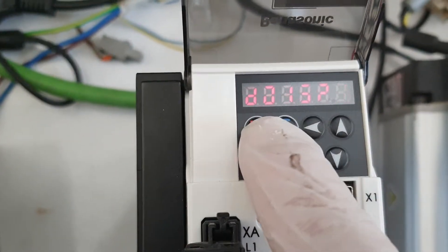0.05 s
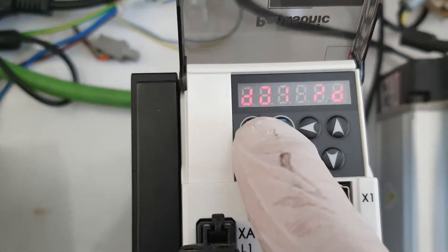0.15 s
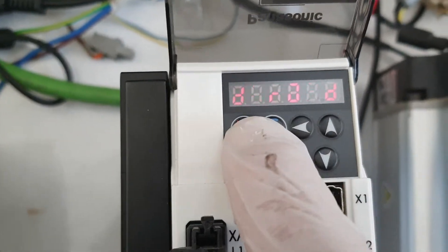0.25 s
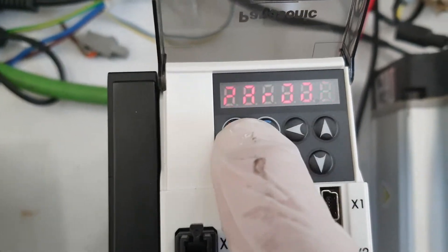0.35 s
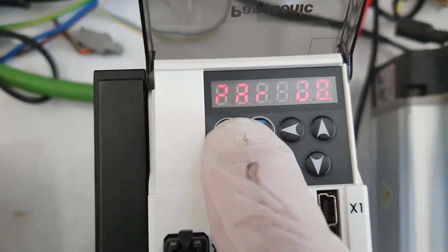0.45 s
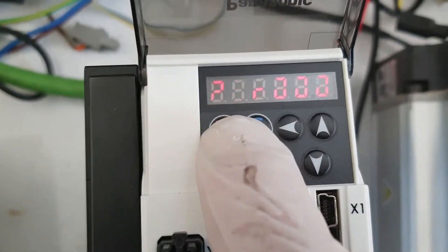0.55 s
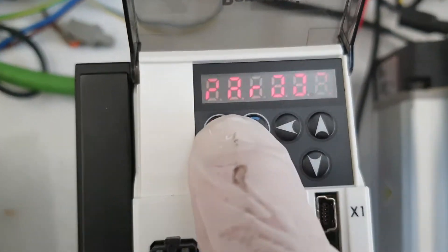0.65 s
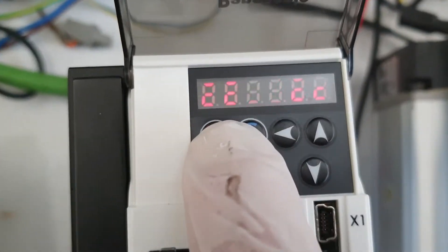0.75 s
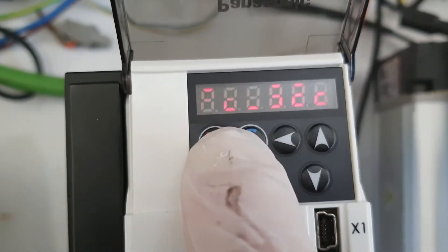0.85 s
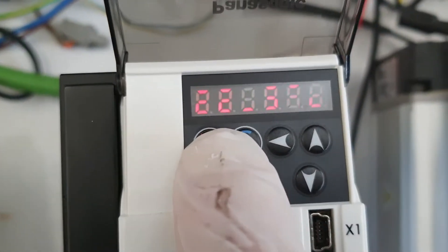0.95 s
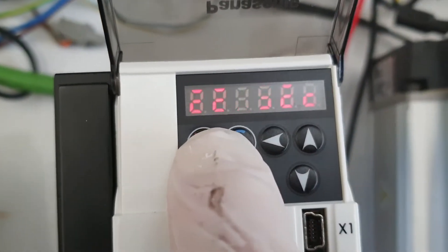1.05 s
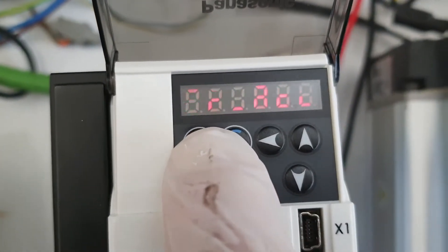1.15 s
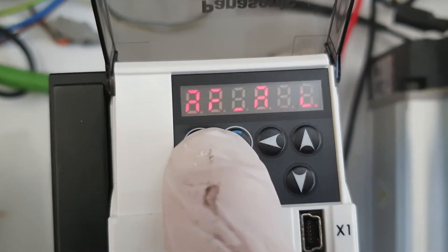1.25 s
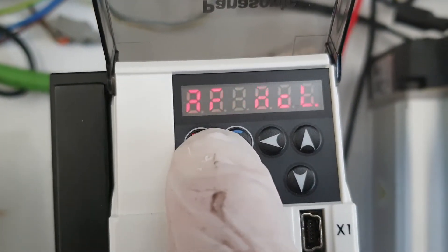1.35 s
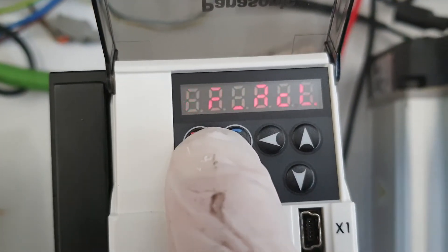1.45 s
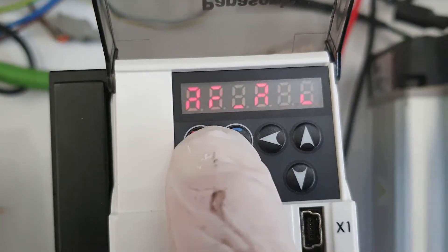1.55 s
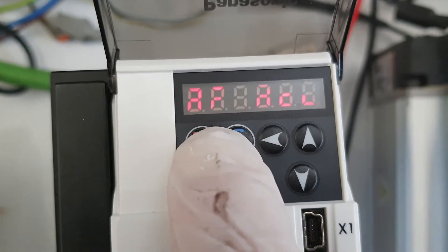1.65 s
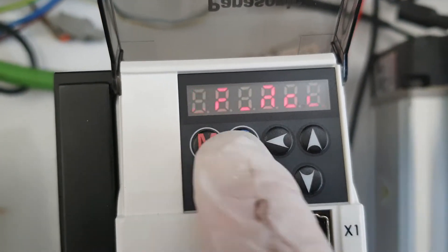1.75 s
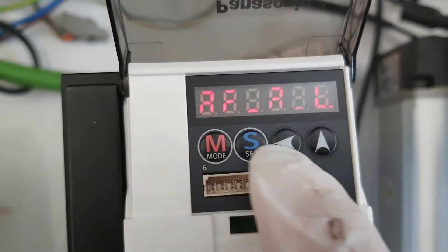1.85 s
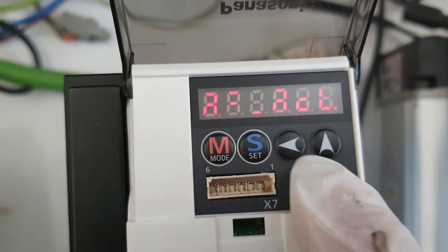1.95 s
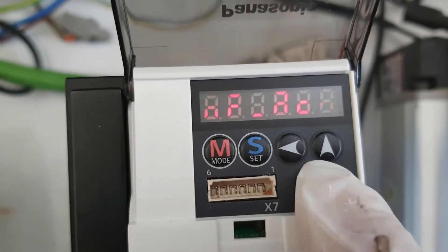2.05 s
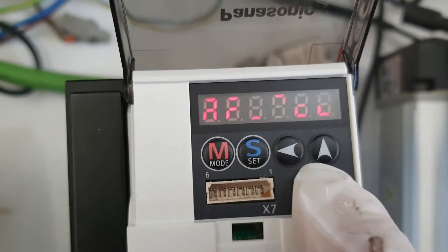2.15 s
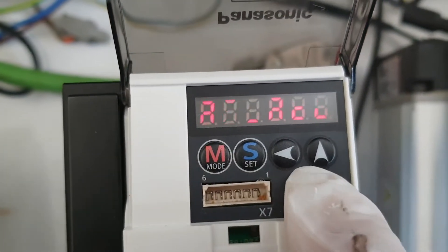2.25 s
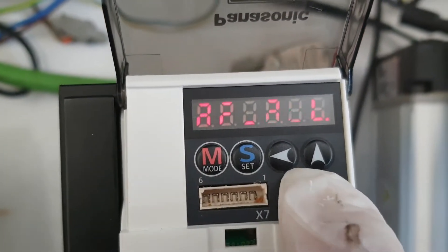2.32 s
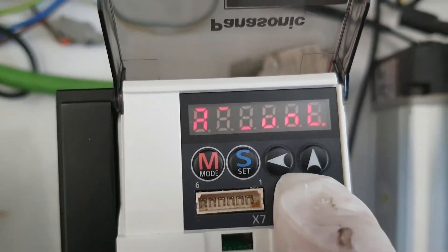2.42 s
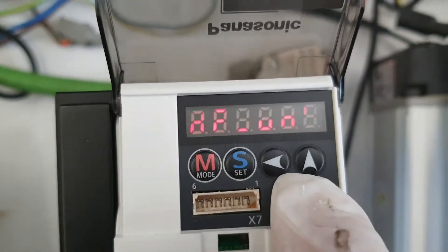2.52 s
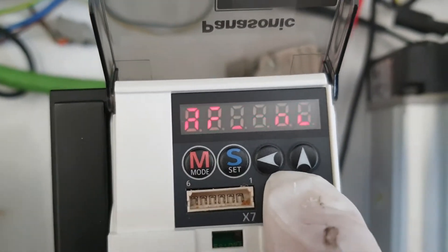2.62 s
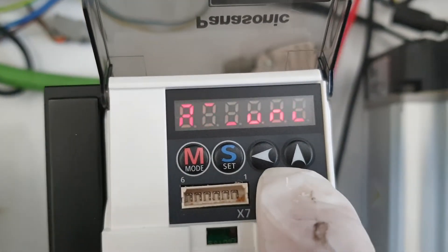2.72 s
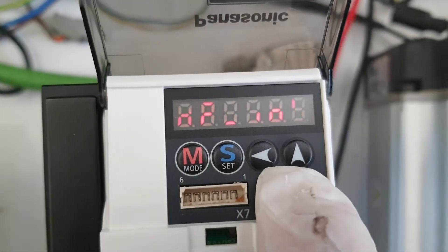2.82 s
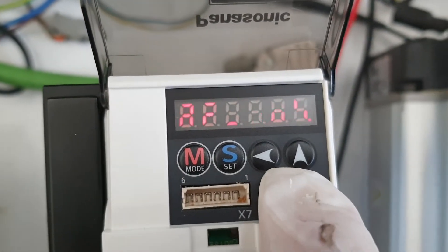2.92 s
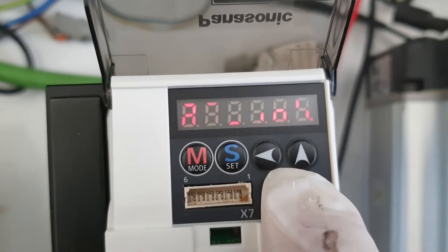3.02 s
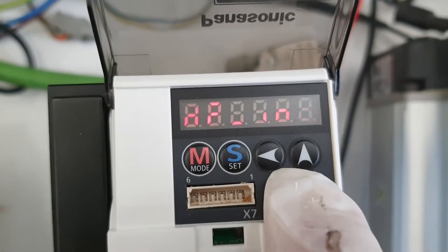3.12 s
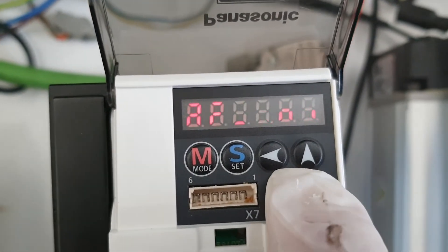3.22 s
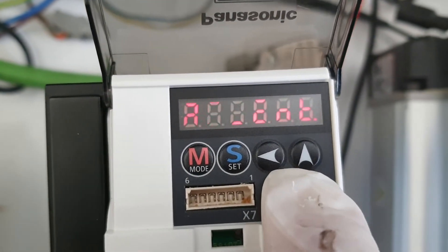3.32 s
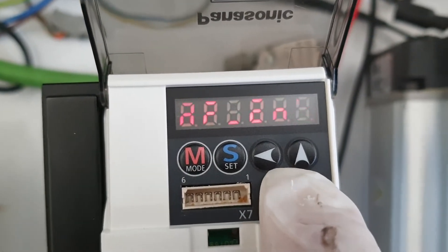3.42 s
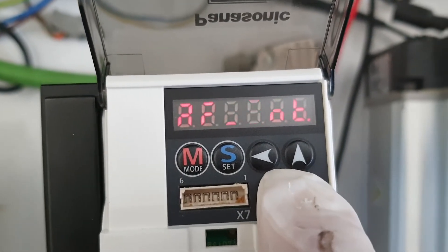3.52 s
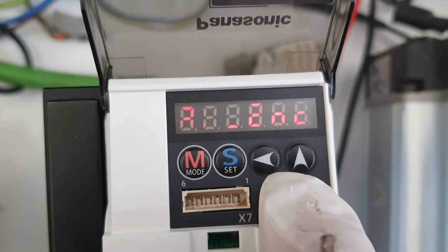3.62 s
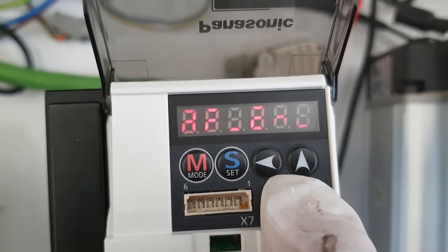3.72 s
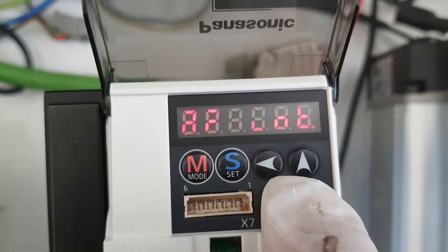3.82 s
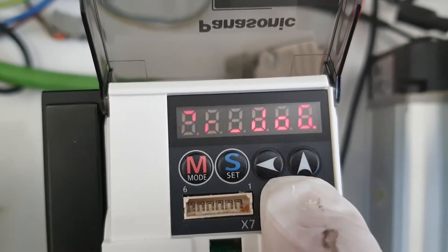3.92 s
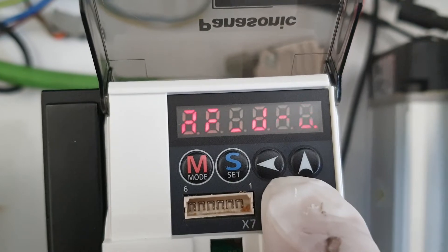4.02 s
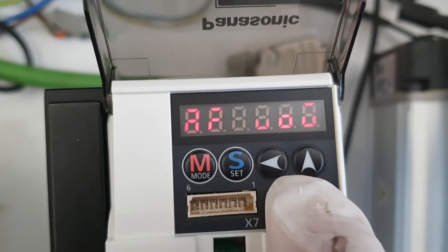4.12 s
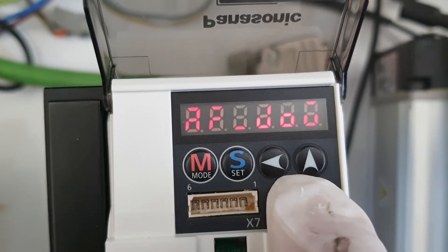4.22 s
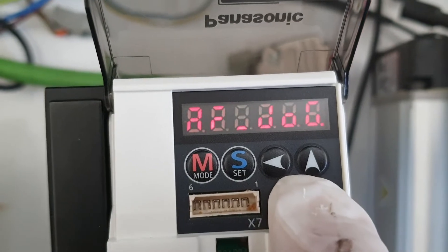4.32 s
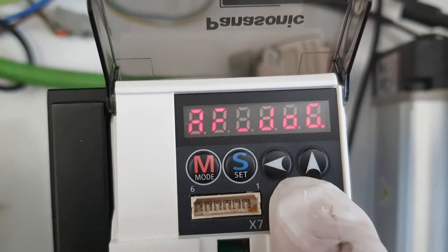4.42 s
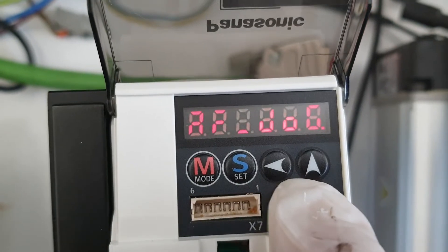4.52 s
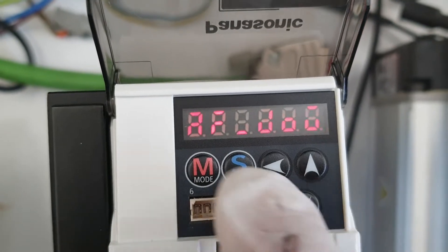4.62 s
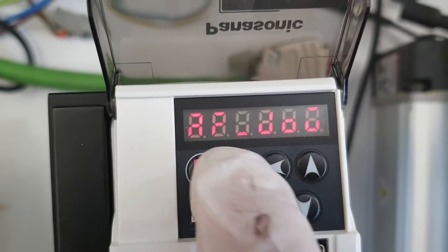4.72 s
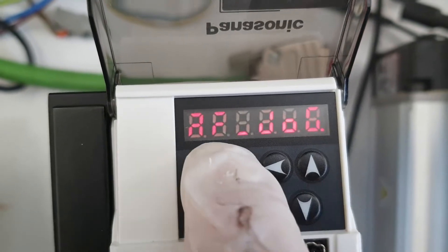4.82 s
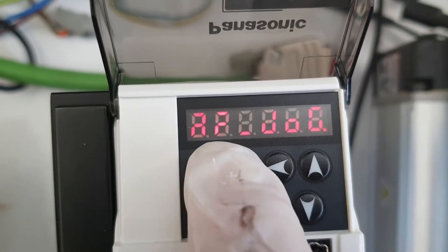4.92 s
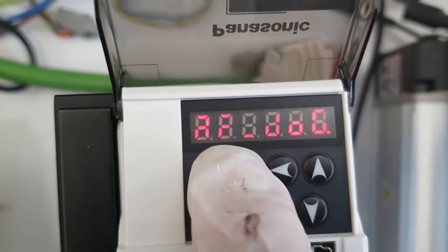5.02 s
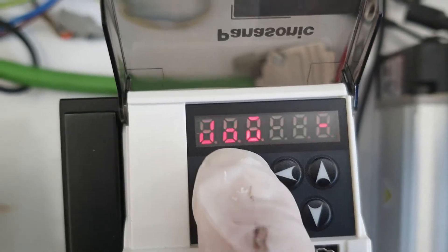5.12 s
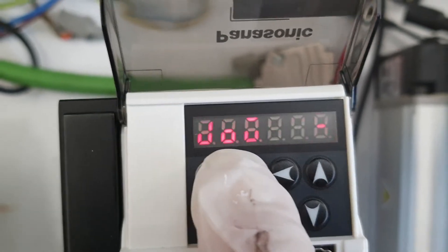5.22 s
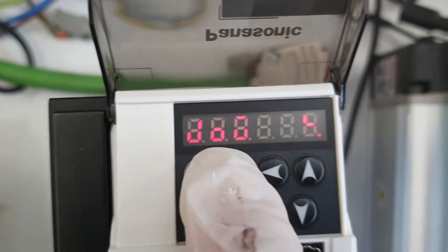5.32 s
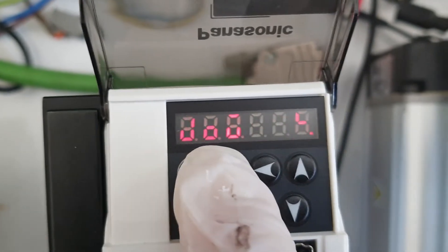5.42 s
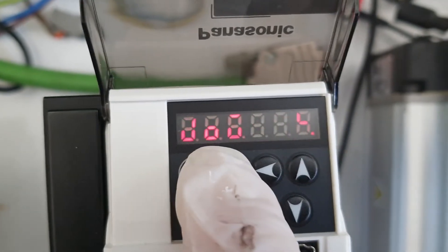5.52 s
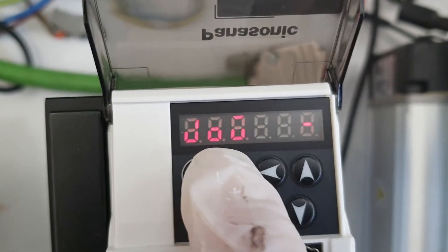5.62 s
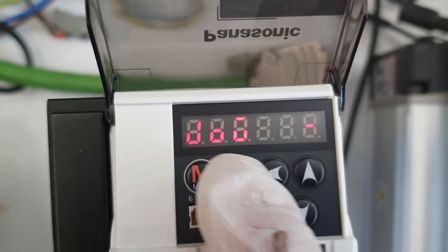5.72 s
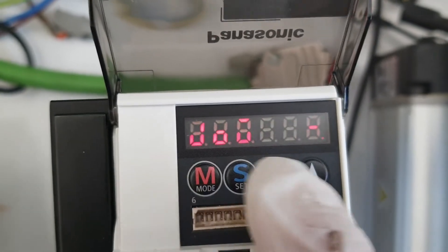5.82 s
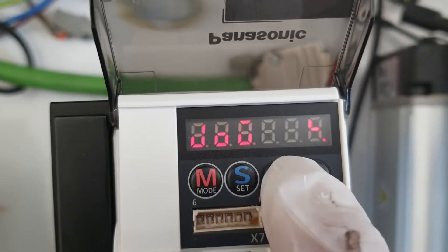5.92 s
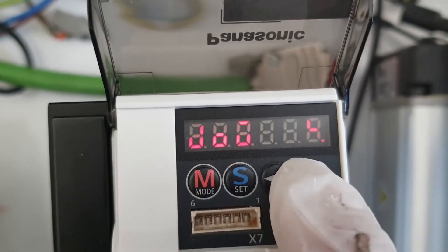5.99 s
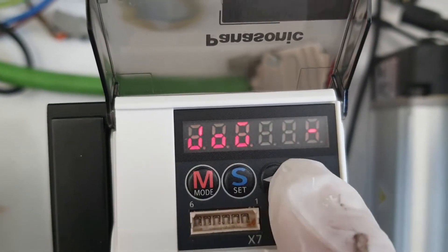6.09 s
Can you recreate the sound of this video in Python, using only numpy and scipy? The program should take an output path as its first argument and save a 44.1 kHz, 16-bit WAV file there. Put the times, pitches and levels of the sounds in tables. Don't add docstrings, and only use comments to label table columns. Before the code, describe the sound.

A phone held close picks up a gloved finger working keys on a small hollow plastic box in a workshop. A low, far ventilation drone wavers slightly beneath a faint steady hiss. After a tiny glove tick at 0.2 s, the first key is pressed at about 0.27, 0.7 and 1.16 s; each bright snap is answered roughly 0.16 s later by a louder, duller rebound. From 1.8 to 2.3 s the glove ticks and crackles as it moves. Another key, with a more hollow ring, clicks at 2.37, 2.75, 3.25 and 3.9 s, again in pairs; a barely audible thin creak sits near 2.4 s. A small rub comes at 4.6 s, then one hard, quick press at 5.1 s with a strong rebound at 5.19 s. Faint slow glove brushing at 5.65-6.05 s closes it. Clicks are dry and very short, with a slight room tail.

```python
import sys
import numpy as np
from scipy import signal
from scipy.fft import rfft, irfft, next_fast_len
from scipy.io import wavfile
from scipy.ndimage import uniform_filter1d

SR = 44100
rng = np.random.default_rng(int(sys.argv[2]) if len(sys.argv) > 2 else 0)


def dump(signal):
    limited = np.clip(np.atleast_2d(signal).T, -1, 1)
    pcm = np.round(limited * 32767).astype(np.int16)
    wavfile.write(sys.argv[1], SR, pcm)


def boost_factor(decibels):
    exponent = np.asarray(decibels, float) / 20
    return 10 ** exponent


N = 271215
TIME = np.arange(N) / SR
SIDES = np.array([[.5], [-.5]])

# f/Hz, level/dB, time to fade by 60 dB/s
CASE_AIR = [
    (1349, -2, 0.044),
    (946, -18, 0.069),
]


def unit(x):
    return x / np.sqrt(np.mean(x ** 2) + 1e-20)


def along(points, hz):
    f, *columns = np.transpose(points)
    return np.array([np.interp(np.log(hz + 1), np.log(f + 1), column) for column in columns])


def curve(rows):
    return np.interp(TIME, *np.transpose(rows))


def filtered(x, response):
    length = x.shape[-1]
    m = next_fast_len(length + 8192)
    return irfft(rfft(x, m) * response(np.fft.rfftfreq(m, 1 / SR)), m)[..., :length]


def causal(db):
    cepstrum = irfft(np.log(boost_factor(db)))
    half = cepstrum.shape[-1] // 2
    cepstrum[..., 1:half] *= 2
    cepstrum[..., half + 1:] = 0
    return np.exp(rfft(cepstrum))


def patchy(patchy_db):
    z = signal.stft(rng.standard_normal((2, N + 512)), nperseg=512)[2]
    field = uniform_filter1d(rng.standard_normal(z.shape[1:]), 5, 0)
    field = uniform_filter1d(field, 12, 1)
    return signal.istft(z * boost_factor(patchy_db * unit(field)), nperseg=512)[1][:, :N]


def add(out, s, x):
    part = out[:, round(s * SR):][:, :x.shape[1]]
    part += x[:, :part.shape[1]]


def first_key():
    # dome snaps down t/s, snaps back t/s, force/dB
    pushes = [
        (.2716, .4394, -25.5),
        (.6943, .8482, -23.8),
        (1.1584, 1.322, -24.8),
    ]
    # f/Hz, left level/dB, right level/dB
    modes = [(980, 0.0, 11.5), (1450, 10.5, 7.0), (1754, 1.0, 12.0), (2070, 8.5, 1.0), (2650, 15.0, 10.5),
             (3040, 11.0, -17.0), (3700, 14.5, 7.0), (4160, 16.5, 4.0), (4800, 7.0, 10.5),
             (5160, 11.5, -3.0), (5530, -3.0, 12.5), (5920, 11.0, 14.5), (7250, 9.5, 15.0),
             (7800, 12.0, 9.0), (10860, -2.5, -18.0), (12050, -13.0, 0.0), (13100, -8.0, -0.5),
             (1326, 0, 12.5), (6550, -11, 16.5), (8670, 6.5, 2.5), (9800, -5, -20), (14300, -18, -14),
             (15400, -22, -11)]
    return key(pushes, modes, lead_s=.00009, rebound_db=7.0, shift_db=1.1, press_db=2, release_db=-3.0,
               scatter_db=-17.0, hollow_db=-2, room_db=-42.0)


def arrow_key():
    # dome snaps down t/s, snaps back t/s, force/dB
    pushes = [
        (2.3652, 2.5073, -24.8),
        (2.7517, 2.9309, -25),
        (3.2536, 3.3913, -25.2),
        (3.9066, 4.0543, -25),
    ]
    # f/Hz, left level/dB, right level/dB
    modes = [(950, -16.0, 6.0), (1367, 1.0, 16.0), (1740, 4.0, 10.5), (2130, 9.5, 6.0), (2320, -22.0, -1.0),
             (2555, 9.0, -3.0), (2970, 5.5, 6.0), (3520, -27.0, 0.0), (4030, 16.5, 12.5),
             (4610, 12.0, -14.0), (5030, 13.5, -13.0), (5470, 3.0, 9.0), (5750, 9.0, 9.0),
             (6550, 9.0, 12.5), (7380, 13.0, 9.0), (7850, 14.0, 2.0), (8140, 2.0, -3.0), (8680, 12.0, 5.0),
             (10110, -2.0, -15.0), (10680, 2.0, -17.0), (11470, -4.0, -11.0), (12200, 0.5, -13.0),
             (13500, -13.0, -4.0), (14660, -5.0, -13.0), (9000, 7.0, -16), (15500, -15, -10)]
    return key(pushes, modes, lead_s=.00016, rebound_db=6.5, shift_db=-1.8, press_db=4.0, release_db=-0.4,
               scatter_db=-14.5, hollow_db=21, room_db=-43.0)


def last_key():
    # dome snaps down t/s, snaps back t/s, force/dB
    pushes = [
        (5.1038, 5.1888, -21.5),
    ]
    # f/Hz, left level/dB, right level/dB
    modes = [(1030, -6.0, 9.5), (1376, 14.0, 17.0), (2050, 9.0, -4.0), (2620, 17.0, 2.0),
             (2880, 13.0, 14.0), (3240, 10.0, -10.0), (3770, 12.0, 5.5), (4140, 16.0, 10.5),
             (5150, 14.0, 7.0), (5760, 15.5, 10.5), (6840, 11.5, 5.0), (7540, 9.0, 9.5), (8240, 8.0, -7.0),
             (10200, 3.5, -14.0), (11400, -2.0, -12.0), (12230, -12.0, -3.0), (13180, -17.0, -3.0),
             (13650, -14.0, -8.0), (14650, -15.0, -3.0), (15490, -13.0, -8.5), (8960, 5.8, -5),
             (4500, 17, 4)]
    return key(pushes, modes, lead_s=0.00015, rebound_db=9.5, shift_db=-1.0, press_db=3.5, release_db=-0.5,
               scatter_db=-16.5, hollow_db=14, room_db=-44.5)


def key(pushes, modes, lead_s, rebound_db, shift_db, press_db, release_db, scatter_db, hollow_db, room_db):
    # f/Hz, level/dB
    wall_colour = [(500, -10.5), (1300, 9.5), (2500, 0.5), (4500, -2), (7500, -3.5), (8800, -13),
                   (9600, -23.5), (13000, -9), (16000, -19)]
    mode_scatter_db = 0.87
    case_lag_s, case_hz = .0012, 2090
    out, t = np.zeros((2, N)), np.arange(3000) / SR
    echoes = rng.standard_normal((2, len(t)))

    snaps = []
    for down_s, up_s, force_db in pushes:
        snaps.append((down_s, force_db, shift_db, press_db))
        snaps.append((up_s, force_db + rebound_db, -shift_db, release_db))

    for s, db, pan_db, bright_db in snaps:
        fresh = 0.3 * rng.standard_normal(echoes.shape)
        path = boost_factor(scatter_db - 60 * t / 0.014) * (echoes + fresh)
        path[:, 0] = 1
        shaken = np.array(modes) + mode_scatter_db * rng.standard_normal((len(modes), 1)) * [0, 1, 1]

        def tilt(hz):
            return bright_db * np.clip(np.log2(hz / 5500 + 1e-9), -.6, 2)

        def ringing(hz):
            thin_db = -12 * np.clip(np.log2(900 / (hz + 20)), 0, 4)
            delay_s = np.array([[0], [lead_s]])
            late = np.exp(-2j * np.pi * hz * delay_s)
            slow = np.exp(-2j * np.pi * case_lag_s * case_hz * np.tanh(hz / case_hz))
            return causal(modes_db(shaken, hollow_db, hz) + tilt(hz) + thin_db) * late * slow

        direct = boost_factor(db + 9.5 + pan_db * SIDES) * filtered(evened(path), ringing)
        add(out, s + .0003, direct)
        walls = filtered(room(wall_colour), lambda hz: boost_factor(.8 * tilt(hz)))
        add(out, s, boost_factor(db + room_db) * walls)
    return out


def modes_db(modes, hollow_db, f):
    panel = 0
    for hz, left_db, right_db in modes:
        width_hz = 75 + 0.044 * hz
        panel = panel + boost_factor([[left_db], [right_db]]) ** 2 / (1 + (2 * (f - hz) / width_hz) ** 2) ** 1.69
    air = sum(boost_factor(db + hollow_db) ** 2 / (1 + (t60 * (f - hz) / 0.86) ** 2) for hz, db, t60 in CASE_AIR)
    return 10 * np.log10(panel + air)


def evened(path):
    def flatten(hz):
        power = np.abs(rfft(path, 2 * len(hz) - 2)) ** 2
        return causal(-10 * np.log10(uniform_filter1d(power, len(hz) // 90, axis=1)))
    return filtered(path, flatten)


def room(colour):
    # f/Hz, time to fade by 60 dB/s
    fade_times = [(500, 0.2), (2000, 0.3), (5000, 0.41), (9000, 0.4), (15000, 0.22)]
    hz, t, z = signal.stft(rng.standard_normal((2, SR // 3)), SR, nperseg=256)
    fading = boost_factor(along(colour, hz).T - 60 * t / along(fade_times, hz).T)
    tail = signal.istft(z * fading, SR, nperseg=256)[1]
    rise = np.clip(np.arange(tail.shape[1]) / SR / 0.0013 - 1, 0, 1)
    return rise * unit(tail)


def creak():
    start_s, hold_s, edge_s = 2.41, 0.049, .04
    outside_s = np.maximum(start_s - TIME, TIME - start_s - hold_s)
    level = boost_factor(-66.5) * np.clip(1 - outside_s / edge_s, 0, 1)
    drift = 1.6 * unit(uniform_filter1d(rng.standard_normal(N), size=700))
    return level * np.sin(2 * np.pi * 2605 * TIME + drift)


def glove():
    # t/s, peak level/dB, f/Hz, left-right/dB, knock level/dB
    ticks = [(0.2114, -48, 6200, -6, -15), (0.653, -41, 8700, 2, -33), (1.776, -44.5, 7650, 5, -12),
             (1.782, -48, 6310, 1, -17), (1.8438, -30, 5570, 4.5, -7), (1.8507, -52, 5600, 2, -16),
             (1.8623, -32.5, 8060, 4, -12), (1.9524, -37.5, 11500, 18, -15.5), (1.955, -36, 5900, 3, -8),
             (1.9672, -30.5, 4150, 11, -20.5), (2.226, -56, 8750, 4.5, -13), (2.2327, -47, 7240, -6, -15),
             (2.2605, -36.5, 7040, -4, -8), (2.2646, -41.5, 4500, 4, -3.5), (4.567, -56, 6550, -2.0, -9),
             (4.6376, -43, 8500, 12.5, -28), (4.8435, -57, 5200, 0.5, -20), (5.031, -51.5, 4240, -16, -15),
             (5.6494, -53, 6540, -4.5, -7), (5.7722, -55, 8680, 3, -20), (5.7804, -55, 8700, 9, -20),
             (5.8162, -49.5, 10500, 14, -25), (6.0185, -49, 12500, 3, -25), (6.041, -57, 13000, 3, -25)]
    # f/Hz, level per Hz/dB
    skin_colour = [(1470, -10.5), (2500, 2.5), (2700, -4.5), (3440, -9), (5740, -1.5), (10000, -9.5),
                   (15200, -9.5), (16000, -21.5)]
    out, t = np.zeros((2, N)), np.arange(2000) / SR

    def bump(f, centre_hz, octaves):
        return np.exp(-(np.log2(f / centre_hz + 1e-9) / octaves) ** 2)

    for s, db, hz, pan_db, body_db in ticks:
        fade = boost_factor(-60 * t / .0035) + boost_factor(-20 - 60 * t / .025)
        slip = rng.standard_normal((2, len(t))) * fade
        focus_db = np.clip(8.5 - 0.35 * (db + 35), 7, 18)

        def skin(f):
            fold_db = focus_db * (bump(f, hz, 0.38) - 1)
            knock_db = (body_db + 17.0) * bump(f, 2540, 0.58)
            return causal(along(skin_colour, f) * .5 + 7 + fold_db + knock_db)

        add(out, s, boost_factor(db + 12.5 + pan_db * SIDES) * filtered(evened(slip), skin))
        add(out, s, boost_factor(db + body_db - 6.0) * hollow(t)[None])
        add(out, s, boost_factor(db - 45.5) * room(skin_colour))

    rub = (lambda hz: hz < 9300, strokes(0.97, 0))
    finest_brush = (lambda hz: hz >= 9300, strokes(0.99, 1))
    for band, level in (rub, finest_brush):
        grain = boost_factor(3.2 * unit(uniform_filter1d(rng.standard_normal(N), 60)))
        crackle = filtered(grain * patchy(patchy_db=2.0), lambda hz: boost_factor(along(skin_colour, hz)) * band(hz))
        out += boost_factor(-1.5) * level * unit(crackle)
    return out


def strokes(fade, brush):
    # fastest moment t/s, rub level/dB, rise/s, fall/s, finest brush over rub/dB
    slides = [
        (.21, -66, .03, .13, -15),
        (1.79, -62, .03, .12, -11),
        (1.855, -56.5, 0.051, .06, -8),
        (1.965, -70, .05, .08, -5),
        (2.265, -61, 0.03, .06, -15),
        (4.615, -66, .025, .04, -2),
        (5.04, -68, .02, .2, -13.5),
        (5.865, -60, .12, .09, -5),
        (6.03, -72, .045, .04, 6),
    ]
    fade_db = 15.5
    total = 0
    for s, db, rise_s, fall_s, brush_db in slides:
        away = np.maximum((s - TIME) / rise_s, (TIME - s) / fall_s)
        total = total + boost_factor(db + brush * brush_db - fade * fade_db * away ** 1.17)
    return total


def hollow(t):
    ring = sum(boost_factor(db - 60 * t / t60) * np.sin(2 * np.pi * hz * t) for hz, db, t60 in CASE_AIR)
    return ring * (1 - np.exp(-t / 0.0013))


def drone():
    # f/Hz, level per Hz/dB
    fan_colour = [(21, -52), (39, -12), (64, -11.5), (98, -3), (173, -5.5), (203, -8), (246, -10), (302, 1),
                  (340, -7), (417, -10), (442, -15.5), (476, -12), (629, -22), (784, -16.5), (1200, -39),
                  (1560, -48.5), (2640, -120)]
    # f/Hz, width/Hz, level/dB
    duct_humps = [
        (140.6, 16, 5),
        (170.7, 11, 3.5),
        (284.3, 15.5, 2),
        (358.9, 11.2, 7.5),
        (405, 5.6, 2.5),
        (840, 20, 1),
    ]
    # t/s, level/dB
    swell = [(0.0, -45.5), (0.56, -47.5), (1.15, -45), (1.44, -47.5), (2.91, -45.5), (3.03, -47),
             (3.46, -46), (4.01, -47), (4.21, -46), (5.41, -47.5), (5.7, -46), (6.15, -48)]
    # f/Hz, likeness from 0 to 1
    likeness = [(35, 0.7), (60, 0.99), (130, 0.9), (300, 0.93), (500, 0.58), (800, 0.6), (1200, 0)]
    # f/Hz, left-right/dB
    lean = [(40, -8), (110, -7.5), (200, -6.5), (380, -5), (600, 0), (900, -7.5)]

    def air(f):
        ducts_db = sum(db / (1 + (2 * (f - hz) / width_hz) ** 2) for hz, width_hz, db in duct_humps)
        turn = np.arccos(np.clip(along(likeness, f)[0], -1, 1)) / 2
        return boost_factor(along(fan_colour, f) + ducts_db) * [np.cos(turn), np.sin(turn)]

    def sideways(f):
        lead = np.exp(1j * np.pi * f * 0.00019 * np.array([[1], [-1]]))
        return boost_factor(along(lean, f) * SIDES) * lead

    mid, side = filtered(patchy(patchy_db=0.5), air)
    pair = filtered(np.array([mid + side, mid - side]), sideways)
    return boost_factor(curve(swell) + 2) * unit(pair)


def hiss():
    # f/Hz, left level/dB, right level/dB
    hiss_colour = [(500, -120, -120), (871, 5, 7.5), (1486, -4.5, -0.5), (2490, -7, -5.5),
                   (3070, -24.5, -18), (4500, -20, -19), (6000, -35, -23), (6300, -23, -13),
                   (7660, -21.5, -14.5), (8700, -13.5, -20), (9800, -32, -32), (12400, -28, -26),
                   (15700, -29, -20.5), (16000, -60, -61.5)]
    return boost_factor(-62) * unit(filtered(patchy(patchy_db=1.04), lambda hz: boost_factor(along(hiss_colour, hz))))


def scene():
    keys = first_key() + arrow_key() + last_key()
    return keys + creak() + glove() + drone() + hiss()


def low_pass(x):
    return signal.sosfilt(signal.butter(12, 16760, fs=SR, output="sos"), x)


def record(dry):
    mix = filtered(dry, lambda hz: boost_factor(-30 * np.clip((hz - 15700) / 900, 0, 3)))
    return low_pass(mix)


dry = scene()
out = record(dry)
dump(out)
```